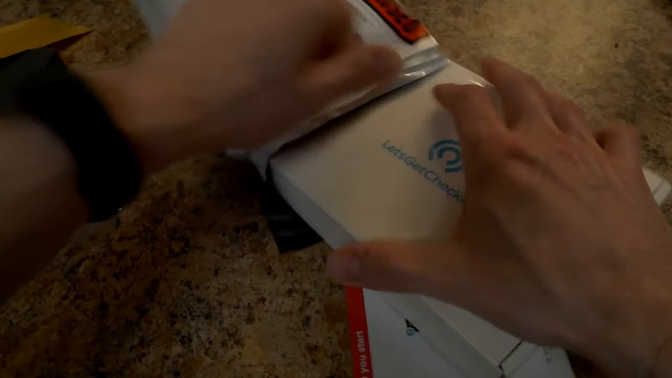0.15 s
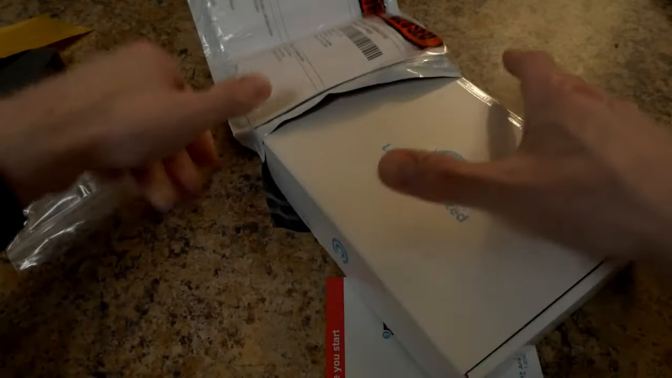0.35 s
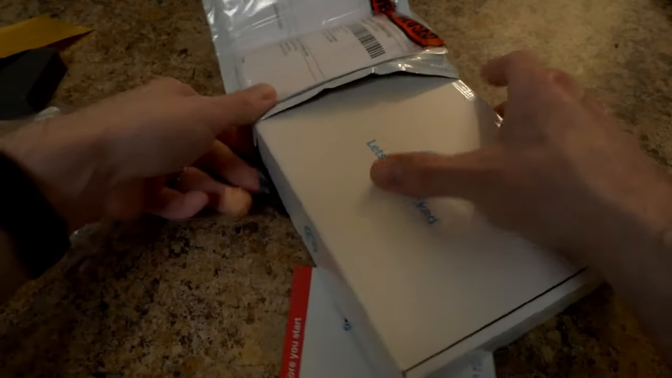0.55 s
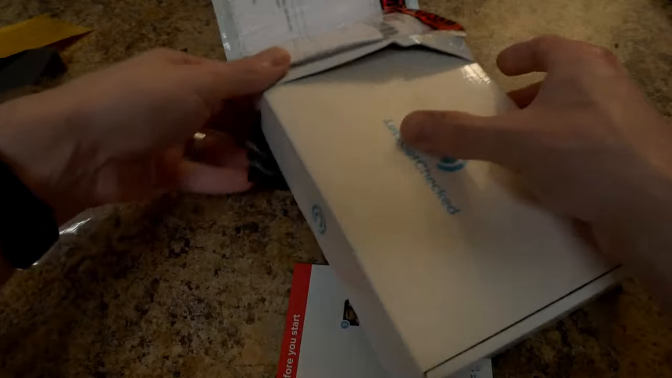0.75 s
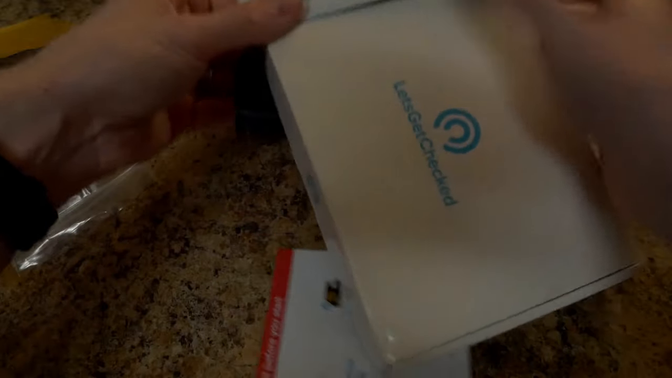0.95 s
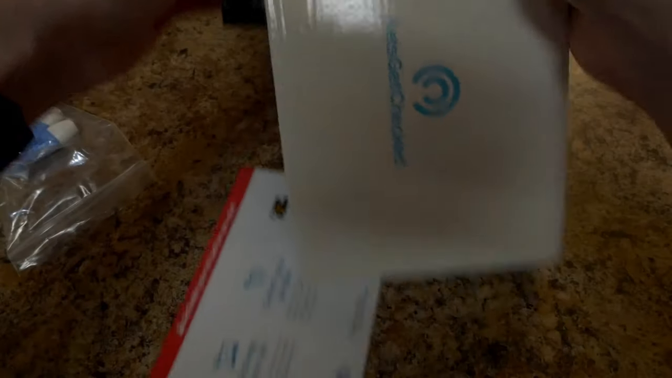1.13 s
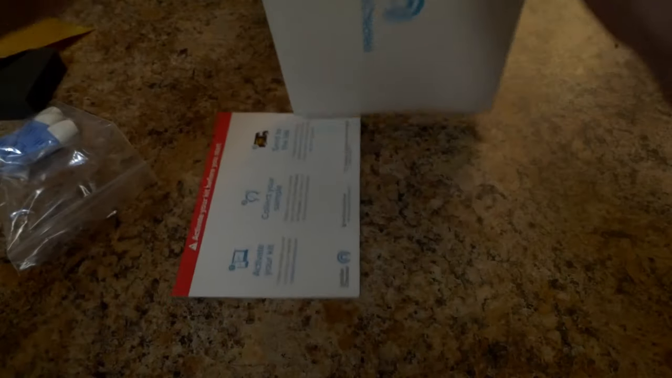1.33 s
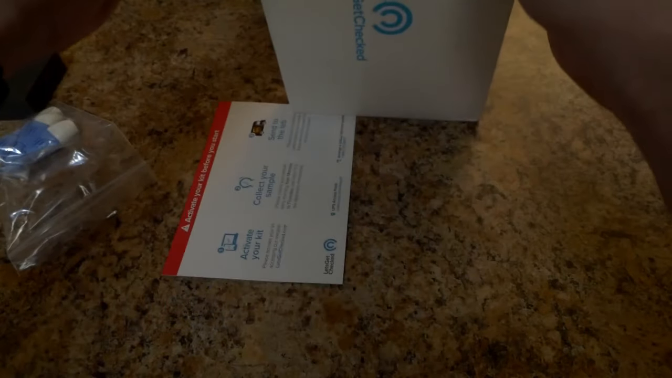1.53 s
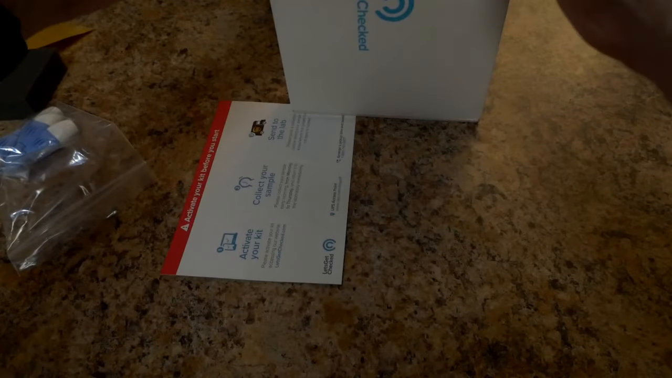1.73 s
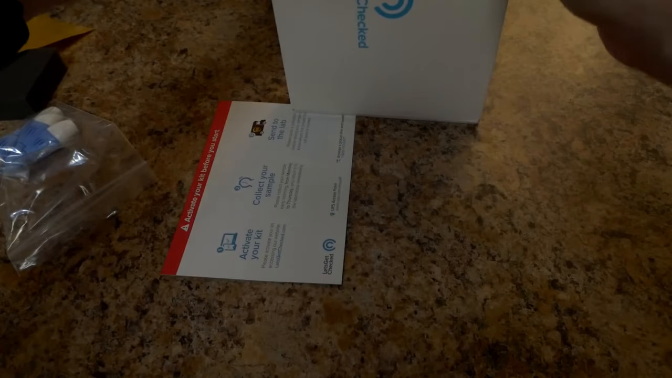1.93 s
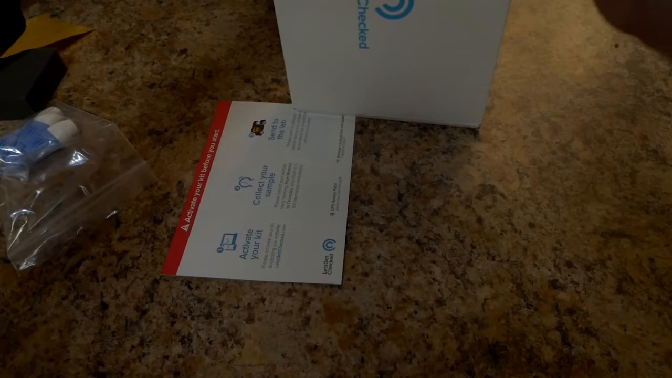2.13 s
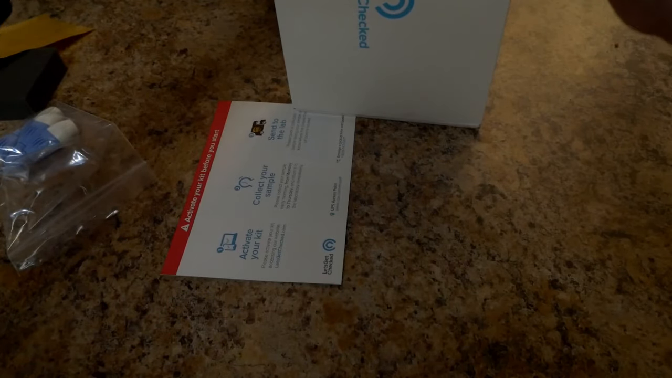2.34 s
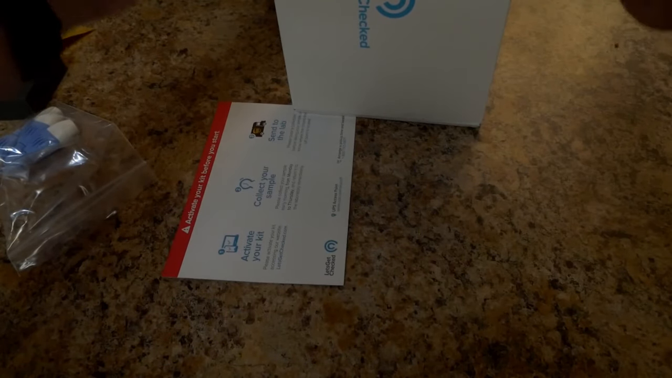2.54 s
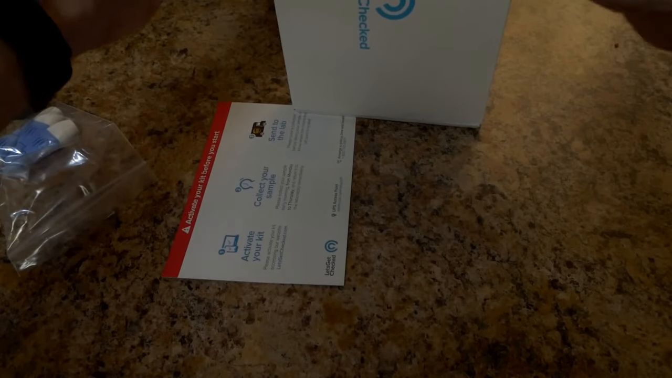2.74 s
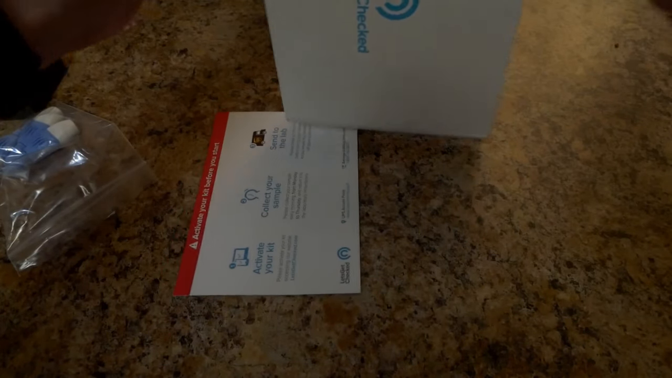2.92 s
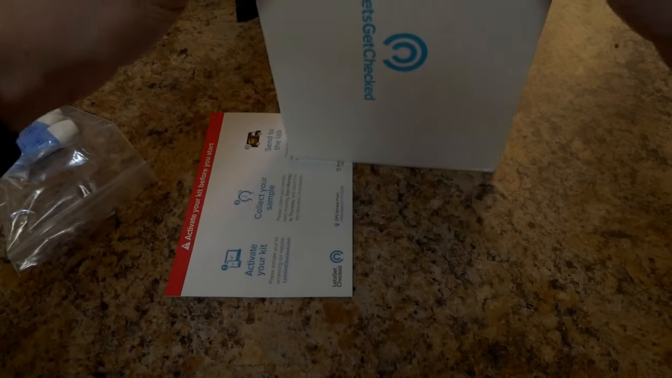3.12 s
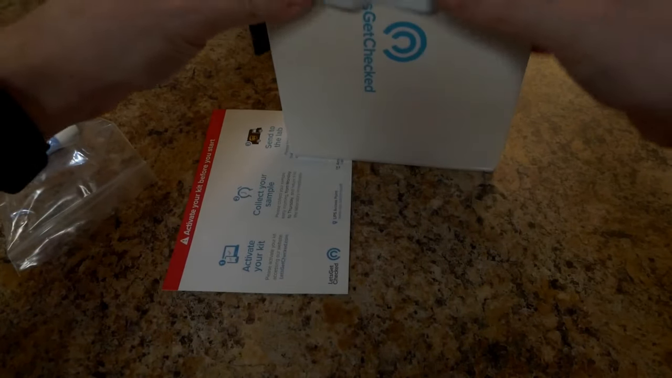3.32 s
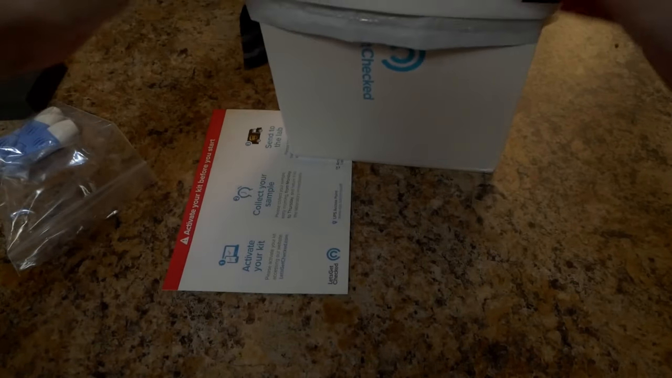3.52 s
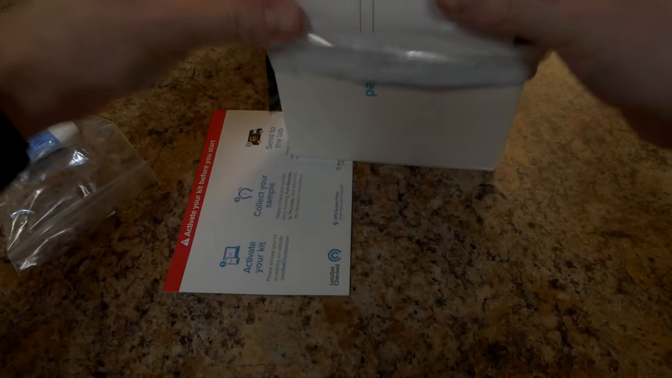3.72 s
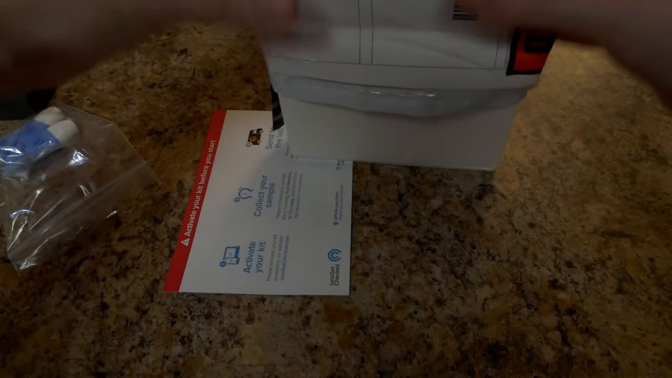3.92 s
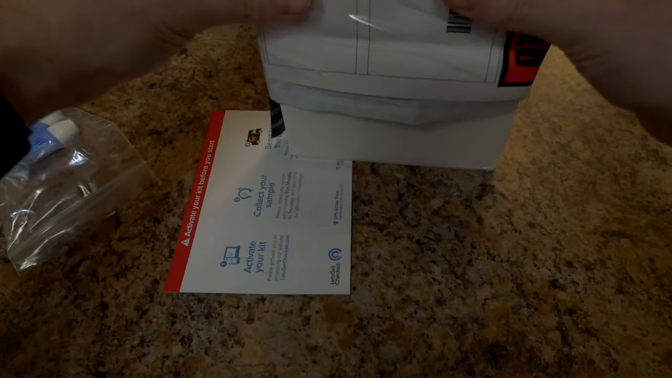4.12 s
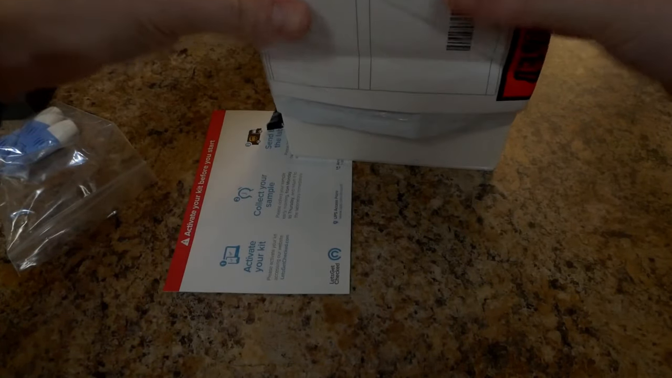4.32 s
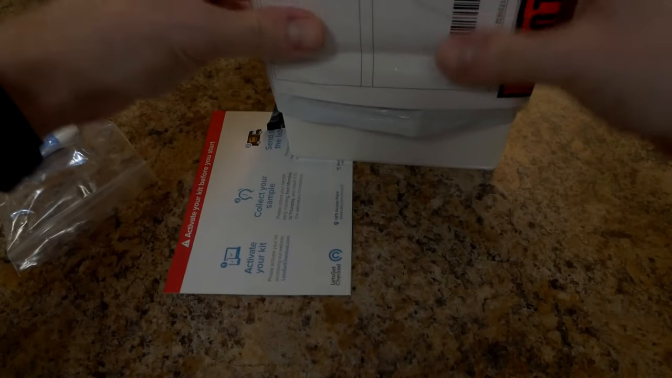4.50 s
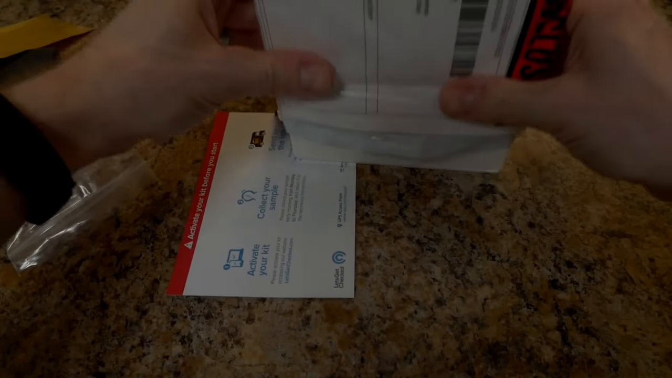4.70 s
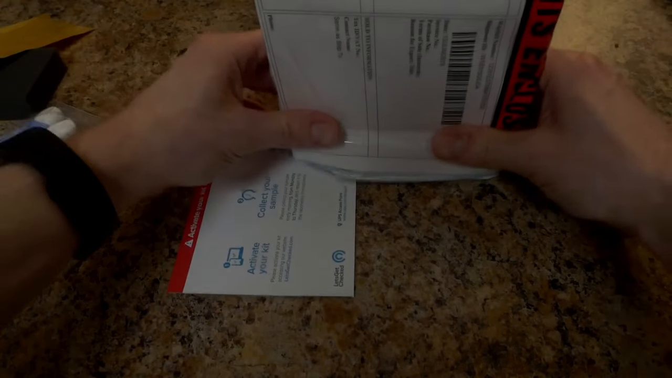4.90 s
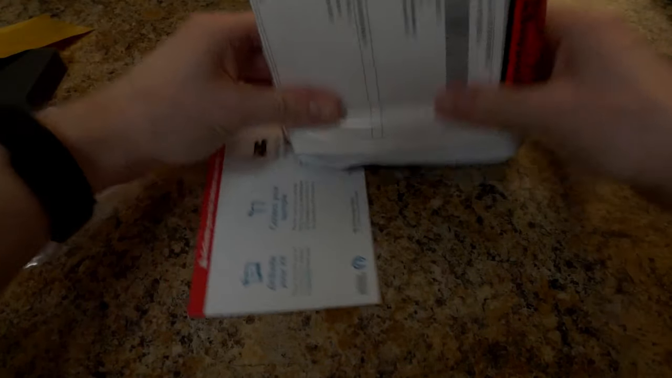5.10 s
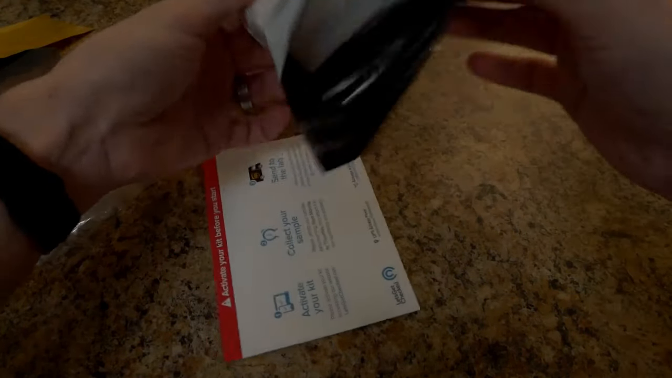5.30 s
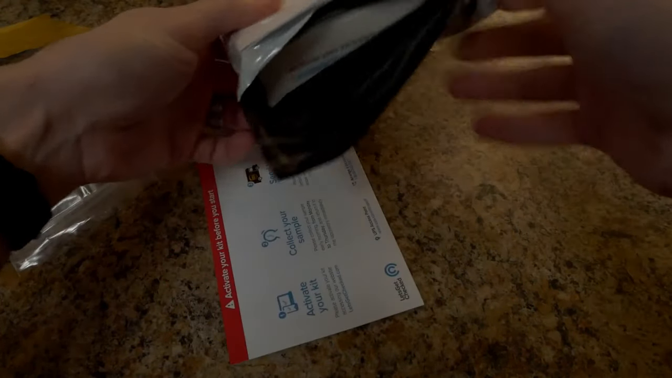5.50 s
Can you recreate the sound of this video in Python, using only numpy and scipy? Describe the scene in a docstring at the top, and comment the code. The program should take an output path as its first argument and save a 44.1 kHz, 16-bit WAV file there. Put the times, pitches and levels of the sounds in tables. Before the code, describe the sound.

Close, crisp plastic rustling with small hollow box knocks, one firm thump on a stone counter, then busier crinkling over low hum.

```python
"""Film crackle opens over a low hum and room air, then knocks on a hollow box and sharp plastic snaps.
Hands work a stiff plastic mailing bag over a cardboard box on a stone kitchen counter, close to the microphone.
Creases are filtered noise bursts that also excite the air pocket and the box; knocks and thuds are decaying
modes of box and counter. The box is twice set down with a falling thump; late on, the bag rubs round it with a
hollow swish. Sparse kitchen reflections surround it all; the sound is nearly mono, with a little added width."""
import sys
import numpy as np
from scipy import signal
from scipy.fft import rfft, irfft, next_fast_len
from scipy.io import wavfile
from scipy.ndimage import uniform_filter1d

SR = 44100
rng = np.random.default_rng(int(sys.argv[2]) if len(sys.argv) > 2 else 0)


def materialize(psi):
    """Save the field psi as 16-bit PCM at rate SR to the path in sys.argv[1].

    A 1-D psi becomes a single channel; in a 2-D psi each row is a channel.
    """
    bounded = np.clip(np.atleast_2d(psi).T, -1, 1)
    quanta = np.round(bounded * 32767).astype(np.int16)
    wavfile.write(sys.argv[1], SR, quanta)


N = 244881


def amp(db):
    """Amplitude factor of a level in dB."""
    return 10 ** (np.asarray(db) / 20)


def evened(x):
    """Scales to an RMS of 1."""
    return x / np.sqrt(np.mean(x ** 2) + 1e-20)


def read(points, hz):
    """Reads a (frequency, value) curve along a logarithmic frequency axis."""
    f, value = np.transpose(points)
    return np.interp(np.log(hz + 1), np.log(f + 1), value)


def coloured(x, points):
    """Filters by a spectrum of (frequency [Hz], level [dB]) points."""
    size = next_fast_len(len(x))
    gain = amp(read(points, np.fft.rfftfreq(size, 1 / SR)))
    return irfft(rfft(x, size) * gain, size)[:len(x)]


def tinted(grain, hz, octaves, skirt_db):
    """Keeps a band around hz and a weak skirt of the rest: the size of a crease sets its colour."""
    f = np.fft.rfftfreq(len(grain), 1 / SR) + 1
    band = amp(-6 * (np.log2(f / hz) / max(octaves, .2)) ** 2) + amp(skirt_db)
    return irfft(rfft(grain) * band, len(grain))


def patchy(x, patchy_db):
    """The colour drifts in patches as different folds take their turn."""
    z = signal.stft(x, nperseg=256)[2]
    patches = rng.standard_normal(z.shape[::-1]).T
    patches = uniform_filter1d(patches, size=9, axis=0)  # smooth over frequency
    patches = evened(uniform_filter1d(patches, size=8, axis=1))  # smooth over time
    return signal.istft(z * amp(patchy_db * patches), nperseg=256)[1][:N]


def add(mix, s, sound):
    """Adds a sound to the mix from time s [s]."""
    part = mix[max(round(s * SR), 0):][:len(sound)]
    part += sound[:len(part)]


def ring(x, hz, width):
    """Two-pole resonance of gain about 1 at hz."""
    r = np.exp(-np.pi * width / SR)
    return signal.lfilter([1 - r, 0, r - 1], [1, -2 * r * np.cos(2 * np.pi * hz / SR), r * r], x)


def burst(noise, ms):
    """A crease gives way: noise that rises at once and decays with a time constant of ms / 2.4."""
    u = np.arange(len(noise)) / SR / (max(ms, .3) / 2400)
    return noise * (1 - np.exp(-3.0 * u)) * np.exp(-u)


# Bursts of rustling close to the microphone: tugs at the bag, and the shudder after the box lands:
# (start [s], end [s], film crackle level at the start [dB], at the end [dB],
# then relative to that crackle: pocket ring [dB], box rumble [dB], top fizz [dB])
RUSTLES = [(0, 0.017, -48, -53, 5, 9.5, -3), (0.142, .25, -48.5, -56, -1.5, 4, -4),
           (0.277, 0.299, -46, -52, 5.5, 7, 5), (0.313, 0.38, -59, -58, 4, 4, -14),
           (0.453, 0.57, -59, -55.5, 3, 6.5, 4.5), (0.647, 0.713, -61.5, -57, 3.5, 2.5, 9),
           (0.791, 1.016, -46, -58.5, -3.5, 2, -3), (1.045, 1.067, -43.5, -49, -10, -8, -6),
           (1.102, 1.19, -42.5, -45.5, -6, -5, 1), (1.252, 1.38, -41.5, -54, -2.5, -5.5, -0.5),
           (1.43, 1.548, -44.5, -58, 2.5, 4, -12), (1.563, 1.621, -54, -54, 2.5, 3, -20),
           (1.69, 1.827, -57.5, -52.5, -2.5, 0, -2), (1.888, 2.11, -50.5, -58, -8, -0.5, -10),
           (2.149, 2.308, -49, -54, -2, 1, -2), (2.353, 2.47, -56, -77, -1, 6.5, 5),
           (2.525, 2.577, -50.5, -33.5, -7.5, -2, -4), (2.577, 2.75, -44, -48, -9, -4, -8),
           (2.81, 2.962, -55, -53, -2, 3, -2), (3.018, 3.023, -54, -56, 7.5, -2, -12),
           (3.076, 3.147, -56, -56.5, -1, -5, 3), (3.215, 3.457, -41, -47, -2, -1.5, 0.5),
           (3.602, 3.716, -57.5, -44, 7.5, 8.5, 5), (3.693, 3.81, -42.5, -44, 2.5, -1, 1),
           (3.812, 3.91, -42, -46.5, -9, -3.5, -9), (4.037, 4.147, -51.5, -44, 2, 1.5, 2),
           (4.185, 4.242, -48, -40, 4.5, -0.5, 8), (4.258, 4.405, -46.5, -54, -9, -7.5, 1),
           (4.535, 4.67, -56.5, -63, 1.5, 2, 4), (4.672, 4.82, -48.5, -47, 1.5, -0.5, 3),
           (4.831, 4.933, -42.5, -41.5, -0.5, -1, 5.5), (4.94, 4.994, -42, -48.5, 2, 1.5, -2),
           (5.093, 5.277, -49.5, -53.5, -2.5, 0.5, 5.5), (5.344, 5.42, -51.5, -39.5, 1, -2.5, 5),
           (5.428, 5.55, -44.5, -42.5, 0, 3.5, 0)]
RISE_DB_PER_S, FALL_DB_PER_S, REST_DB = 498, 242, -64.5  # a rustle bites quickly and lets go slowly


def handling(s):
    """At times s the strongest rustle sets the film level; rows film, pocket, box, fizz [dB], power-weighted."""
    start, end, from_db, to_db, *colour_db = np.transpose(RUSTLES)[:, :, None]
    progress = np.clip((s - start) / np.maximum(end - start, 1e-3), 0, 1)
    held_db = from_db + (to_db - from_db) * progress
    before, after = np.maximum(start - s, 0), np.maximum(s - end, 0)
    rustle_db = held_db - RISE_DB_PER_S * before - FALL_DB_PER_S * after
    share = amp(np.maximum(rustle_db, -200)) ** 2
    film_db = np.maximum(rustle_db.max(0), REST_DB)
    return [film_db] + [(share * c).sum(0) / share.sum(0) for c in colour_db]


def creases(per_s, spread_db):
    """Random instants at which creases flip: many small, a few large, in clumps."""
    clumps = amp(4.5 * evened(uniform_filter1d(rng.standard_normal(N), 900)))
    size = amp(spread_db * np.minimum(rng.exponential(1, N), 5))
    flips = rng.random(N) < per_s * clumps / SR
    return size * flips * rng.choice([-1., 1.], N)


# Air between film and box: (resonance [Hz], width [Hz], level [dB])
POCKET = [(1110, 81, -4), (1276, 240, -3.5), (1654, 200, -2), (2470, 2200, -8)]


def pocket(x, shift=1):
    """Broad resonances of the air trapped under the film."""
    return sum(amp(db) * ring(x, shift * hz, width) for hz, width, db in POCKET)


# Colour of the film crackle: (frequency [Hz], relative level per Hz [dB])
FILM = [(1200, -21), (2000, -5), (2400, -16), (2800, -9.5), (4600, -13), (6300, -8.5), (9000, -3.5),
        (13000, 3), (15000, -3), (16500, 9)]
# Modes of the hollow box, played here and by the knocks: (frequency [Hz], relative level [dB], 60 dB decay [s])
BOX = [(150, 7, 0.042), (245, -3.5, 0.032), (320, 0.5, 0.032), (491, 4.5, 0.023), (627.6, 5, 0.013),
       (800, 0, 0.013), (950, -2, 0.019), (1132, -6, 0.037), (1340, -5, 0.015), (1528, 3, 0.016),
       (1818, 5.5, 0.015), (2220, 4.5, 0.018), (2750, 12, 0.0098)]
SLIDE_SHARE = .65  # RMS of the smooth sliding hiss against the crackle


def rustle():
    """The same crease flips sound in the film, ring the air pocket and shake the box."""
    s = np.arange(0, N / SR + .002, .002)
    t = np.arange(N) / SR
    film_db, pocket_db, box_db, fizz_db = (np.interp(t, s, c) for c in handling(s))
    flips, kind = creases(per_s=1600, spread_db=3.0), rng.integers(0, 24, N)
    crackle = np.zeros(N)
    for k, hz in enumerate(np.geomspace(600, 14000, num=24)):
        grain = burst(tinted(rng.standard_normal(400), hz, octaves=0.27, skirt_db=-12), ms=1.0)
        crackle += signal.oaconvolve(flips * (kind == k), grain / np.linalg.norm(grain))[:N]
    # film also slides over the card: separate hiss for film, pocket and box
    hiss = np.array([patchy(row, patchy_db=5.5) for row in rng.standard_normal((3, N))])
    to_film, to_pocket, to_box = evened(crackle) + SLIDE_SHARE * hiss
    film = evened(coloured(to_film, FILM))
    fizz = signal.sosfiltfilt(signal.butter(2, 8000, "highpass", fs=SR, output="sos"), film)
    film = evened(film - fizz) + amp(fizz_db) * evened(fizz)  # taut film fizzes higher than slack film
    body = np.zeros(N)
    for k, (hz, db, t60) in enumerate(BOX[1:6]):
        body += amp(db) * ring(to_box, hz, 5.86 / t60) * (-1) ** k  # damped more than after a blow
    air = amp(pocket_db) * evened(pocket(to_pocket))
    return amp(film_db) * (film + air + amp(box_db) * evened(body))


# Room air around the microphone: (frequency [Hz], relative level per Hz [dB])
AIR = [(12, -44), (20, 5), (65, 6), (113, 10), (210, 7), (472, 7), (923, 1.5), (1810, -12), (2460, -19),
       (3340, -9), (4540, -25), (13500, -57), (16000, -29)]
AIR_DB = -55  # RMS
# Mains hum under the scene: (time [s], level [dB])
HUM = [(0, -58), (2.5, -58), (3.8, -60), (4.4, -58.5), (4.9, -59.5), (5.1, -67), (5.55, -61)]
HUM_HZ, HUM_HALF_DB = 120, -12.5  # main tone; relative level of the tone an octave below


def room_tone():
    """Steady air noise and a mains hum that wavers slightly in phase and level."""
    t = np.arange(N) / SR
    waver = uniform_filter1d(uniform_filter1d(rng.standard_normal((2, N)), 2500), 2500)
    phase_waver, level_waver = evened(waver)
    turn = 2 * np.pi * HUM_HZ * t + .6 * phase_waver
    hum = np.sqrt(2) * (np.sin(turn) * amp(3 * level_waver) + amp(HUM_HALF_DB) * np.sin(turn / 2))
    air = amp(AIR_DB) * evened(coloured(rng.standard_normal(N), AIR))
    return air + amp(np.interp(t, *np.transpose(HUM))) * hum


# Blows on the box: (time [s], peak level before the bass cut [dB], centre of the modes struck [Hz],
# spread to half amplitude [octaves], at least 0.25 in use)
KNOCKS = [(0.1158, -21.5, 626, 0.87), (0.1633, -29, 1700, 0.49), (0.171, -32, 1800, 0.41),
          (.228, -32, 875, 0.39), (0.2442, -33, 1000, .4), (.268, -38, 1000, 0.43),
          (.2739, -15.5, 810, 0.57), (.2745, -23.5, 1900, 0.36), (0.2814, -26.5, 398, 1.04),
          (.288, -32, 800, .5), (0.3208, -25, 940, 0.37), (.342, -36, 950, 0.44), (.359, -35, 900, .4),
          (0.4159, -31, 358, 1.3), (0.477, -33, 590, 0.7), (.4888, -32, 1720, 0.45),
          (.4974, -28.5, 720, 0.88), (0.5207, -27, 540, 0.28), (.5383, -23, 885, 0.3),
          (0.54, -28.5, 2020, 0.44), (0.6532, -36.5, 660, 0.23), (0.7056, -29.5, 970, 0.63),
          (0.7987, -28, 800, 0.36), (.863, -31, 497, 0.76), (0.997, -39, 696, 0.38),
          (1.042, -39, 1290, 0.91), (1.1248, -31.5, 800, 0.7), (1.177, -29, 1230, 1.6),
          (1.4071, -18, 716, 0.45), (1.4089, -19, 1100, 0.56), (1.4085, -21, 2750, .25),
          (1.418, -26, 1100, 0.45), (1.422, -39, 800, .5), (1.426, -37, 1110, 0.34),
          (1.434, -32, 1800, 0.46), (1.443, -30, 1500, .3), (1.455, -39, 700, .6), (1.468, -33, 900, 0.63),
          (1.474, -42, 1100, .5), (1.514, -38, 1600, 0.25), (1.531, -36, 800, 0.65),
          (1.583, -28, 1200, 1.4), (1.7445, -37.5, 534, 0.21), (1.839, -30.5, 1700, 0.3),
          (1.8982, -32.5, 1320, 0.75), (2.134, -34, 1800, 0.66), (2.147, -36, 600, 1.2),
          (2.251, -34, 1280, 0.75), (2.3585, -37.5, 905, 3.2), (2.454, -32.5, 1880, 0.32),
          (2.5685, -26, 950, 1.2), (2.698, -29, 1400, 3.2), (2.7665, -33, 695, 2), (2.944, -35, 520, 0.22),
          (3.013, -33, 1340, 1.5), (3.0758, -21, 500, 0.68), (3.078, -31, 1900, 0.46),
          (3.088, -27, 1880, 0.37), (3.0926, -31, 600, 0.76), (3.0965, -35, 500, .8), (3.102, -36, 500, .6),
          (3.118, -35, 1070, 0.6), (3.123, -41, 1100, 0.37), (3.2145, -31, 1880, 0.25),
          (3.2508, -33, 1600, 0.45), (3.2694, -24.5, 570, 1.1), (3.2875, -31, 900, .7),
          (3.2945, -24, 470, 1.16), (3.3318, -23, 560, 1.1), (3.338, -31, 517, 0.65),
          (3.3507, -26.5, 1350, 0.22), (3.354, -28, 517, 0.88), (3.3885, -31, 1300, 0.3),
          (3.406, -44, 448, 0.65), (3.454, -30, 1320, 2.5), (3.4973, -50, 1160, 1),
          (3.5322, -37.5, 1110, 1.5), (3.582, -37.5, 603, 0.45), (3.693, -32.5, 1500, 0.44),
          (3.702, -26, 1000, .6), (3.712, -28, 800, .4), (3.721, -32, 1390, .4), (3.733, -26, 1850, .3),
          (3.746, -27, 1600, 0.63), (3.758, -28.5, 1200, 0.35), (3.773, -26, 1800, 0.37),
          (3.783, -31, 1800, .3), (3.791, -28, 1800, 0.26), (3.8107, -21, 1630, 0.55),
          (3.83, -34, 604, 0.61), (3.838, -22.5, 1110, 1), (3.85, -25, 1600, 0.65), (3.8644, -23, 676, 1.6),
          (3.9063, -26.5, 1550, 0.73), (4.0335, -27.5, 530, 1.9), (4.1431, -22.5, 860, 0.74),
          (4.148, -22, 1200, 2), (4.2933, -24.5, 1180, 3.8), (4.5332, -26, 950, 1),
          (4.7234, -23, 1190, 0.57), (4.7316, -31, 875, 0.44), (4.8667, -32, 1490, 0.3),
          (4.869, -30, 600, .4), (4.8942, -18.5, 1460, 0.2), (4.9053, -16, 900, 0.97),
          (4.951, -27, 1400, 0.55), (4.977, -32, 650, 0.63), (5.02, -27, 1610, 0.94),
          (5.1439, -29, 544, 0.67), (5.149, -29, 610, 0.54), (5.157, -28.5, 800, 0.59),
          (5.162, -35, 1300, 0.94), (5.172, -33, 600, 0.32), (5.201, -32.5, 520, 0.98),
          (5.314, -31.5, 540, 1.7), (5.3579, -32, 770, 0.95), (5.3928, -29, 950, 0.29),
          (5.409, -36, 800, 0.87), (5.4274, -22.5, 1100, 1.3), (5.447, -29.5, 550, .4),
          (5.476, -27, 1700, .4), (5.524, -31, 1900, 0.35), (5.52, -30, 550, 0.35),
          (5.462, -29, 1700, 0.49), (5.494, -27.5, 1820, 0.27)]
BOX_SHIFT = 0.038  # each grip bends the box modes (relative spread)


def knocks():
    """Each blow rings the box modes near its centre pitch; low modes speak a little later."""
    out, t = np.zeros(N), np.arange(3000) / SR
    hz, mode_db, t60 = np.transpose(BOX)[:, :, None]
    sides = rng.choice([-1., 1.], (len(KNOCKS), len(BOX), 1))  # the spot struck sets the sign of each mode
    bends = np.exp(BOX_SHIFT * rng.standard_normal(sides.shape))
    for (s, db, centre_hz, octaves), side, bend in zip(KNOCKS, sides, bends):
        struck_db = mode_db - 6 * (np.log2(hz / centre_hz) / max(octaves, .25)) ** 2
        rise = 1 - np.exp(-(t * hz / 0.49) ** 2)
        decay = side * amp(struck_db - 60 * t / t60)
        blow = (decay * rise * np.cos(2 * np.pi * hz * bend * t)).sum(0)
        add(out, s, amp(db) * blow / abs(blow).max())
    # a small box radiates no deep bass
    return signal.sosfilt(signal.butter(2, 90, "highpass", fs=SR, output="sos"), out)


def lesser(per_s, above_db, spread_db, low_hz, high_hz):
    """Random small events whose strength follows the handling: rows (time [s], peak level [dB], pitch [Hz])."""
    place, size, pitch, chance = rng.random((400, 4)).T
    s = place * N / SR
    db = handling(s)[0] + above_db - spread_db * np.log(np.maximum(size, 1 / 8))
    rows = np.transpose([s, db, low_hz * (high_hz / low_hz) ** pitch])
    return list(rows[chance < per_s * N / SR / len(s)])


# Loud creases popping over near the microphone: (time [s], peak level of the bright part [dB], brightest [Hz])
SNAPS = [(0.1194, -42, 6800), (.1672, -36, 3300), (.218, -28.5, 10500), (.229, -24.5, 3620),
         (0.2808, -39, 5900), (.3215, -27.5, 4200), (0.3728, -31.5, 5800), (.4165, -38, 8900),
         (.4548, -36, 3280), (.498, -27, 8150), (.499, -29.5, 3300), (.5405, -43, 2900),
         (.545, -22.5, 9100), (.5465, -30.5, 3320), (0.706, -24, 11200), (.7743, -30, 11000),
         (0.7975, -24, 9700), (0.8598, -20.5, 6300), (.9293, -36, 4100), (.9544, -52, 6300),
         (0.9973, -34, 9000), (1.0415, -17.5, 6750), (1.093, -32, 3500), (1.1213, -25, 9400),
         (1.185, -23, 3700), (1.3516, -60, 6300), (1.383, -23, 7350), (1.4074, -12.5, 6240),
         (1.4082, -17, 3300), (1.425, -35, 3800), (1.4677, -27, 5400), (1.5956, -23, 5800),
         (1.607, -32, 4000), (1.648, -35.5, 3300), (1.689, -33.5, 6960), (1.7541, -31.5, 10600),
         (1.8392, -37, 6800), (1.9027, -28.5, 5400), (1.934, -31, 9500), (1.9463, -22, 8300),
         (1.956, -30, 7160), (2.01, -34.5, 5650), (2.058, -33.5, 10100), (2.106, -41, 3200),
         (2.1347, -25.5, 3240), (2.1486, -26.5, 3920), (2.2188, -31, 7440), (2.2537, -27.5, 6400),
         (2.271, -34, 3000), (2.283, -43, 3600), (2.2976, -22, 8600), (2.5252, -32, 9700),
         (2.57, -30, 5230), (2.658, -24, 3850), (2.698, -26, 3900), (2.721, -28, 9900),
         (2.7336, -26.5, 9200), (2.8314, -39, 7700), (2.9086, -28, 6100), (2.957, -30, 7100),
         (3.011, -40, 3700), (3.0762, -28, 3900), (3.0877, -34, 3100), (3.1174, -23, 5800),
         (3.1786, -35, 5700), (3.186, -32.5, 3280), (3.2095, -17, 6460), (3.2155, -31, 3500),
         (3.2535, -19, 7250), (3.277, -23, 3830), (3.3119, -21, 6100), (3.3544, -19.5, 12600),
         (3.4004, -23.5, 7300), (3.4345, -49, 3200), (3.4554, -25, 5000), (3.502, -41, 3000),
         (3.51, -37, 3300), (3.5456, -33, 12400), (3.582, -39, 4200), (3.597, -43, 2780),
         (3.618, -37, 7500), (3.7063, -22.5, 7700), (3.7645, -22, 10800), (3.831, -28, 4160),
         (3.8497, -26, 7350), (3.865, -21, 6100), (3.8984, -19.5, 8200), (4.0542, -26, 4000),
         (4.061, -25, 7000), (4.077, -33, 6500), (4.083, -31, 3300), (4.099, -23.5, 6550),
         (4.1045, -26, 6200), (4.1171, -24, 7340), (4.121, -33, 2800), (4.1286, -21, 6800),
         (4.13, -31, 4300), (4.149, -24, 5700), (4.2413, -20, 9200), (4.266, -24, 10100),
         (4.2947, -23, 3800), (4.322, -25, 8500), (4.3478, -23, 3170), (4.3822, -27, 11100),
         (4.392, -34, 3600), (4.4123, -30, 10100), (4.439, -36.5, 2980), (4.5107, -37.5, 2730),
         (4.5365, -48, 6400), (4.6153, -32.5, 3030), (4.6897, -25, 7700), (4.7217, -26, 4170),
         (4.9056, -17.5, 6300), (4.906, -23, 3300), (4.977, -20.5, 10200), (5.022, -36, 3100),
         (5.099, -31, 10400), (5.1005, -33, 3320), (5.155, -30, 4000), (5.1837, -16.5, 9200),
         (5.2112, -23.5, 8500), (5.2122, -31, 4230), (5.232, -37, 3400), (5.2415, -32, 9100),
         (5.271, -35, 3960), (5.318, -23, 7650), (5.394, -19.5, 7660), (5.4147, -22, 5300),
         (5.428, -18, 6800)]
SNAP_OCTAVES, SNAP_MS, SNAP_VARIETY = 0.71, 1.68, 0.63  # typical width and length; no two creases alike
SNAP_POCKET_DB, POCKET_DB_PER_OCTAVE = -7, -7  # pocket ring of a 6 kHz pop; brighter creases ring it less
POCKET_SHIFT = 0.2  # each fold traps its own pocket (relative spread of its resonances)


def snaps():
    """Each pop is a short burst of its own colour, with a ring of the pocket."""
    pops = list(SNAPS) + lesser(per_s=60, above_db=0, spread_db=1.8, low_hz=2600, high_hz=12000)
    out = np.zeros(N)
    high = signal.butter(2, 2600, "highpass", fs=SR, output="sos")
    for s, db, hz in pops:
        noise = rng.standard_normal(700)
        width_draw, length_draw, pocket_draw = rng.standard_normal(3)
        octaves = SNAP_OCTAVES * np.exp(SNAP_VARIETY * width_draw)
        ms = SNAP_MS * np.exp(SNAP_VARIETY * np.clip(length_draw, -1, 1))
        bright = signal.sosfilt(high, burst(tinted(noise, hz, octaves, skirt_db=-28), ms))
        low = pocket(burst(noise, ms), np.exp(POCKET_SHIFT * pocket_draw))
        pocket_db = SNAP_POCKET_DB + POCKET_DB_PER_OCTAVE * np.log2(hz / 6000)
        add(out, s, amp(db) * (bright / abs(bright).max() + amp(pocket_db) * low / abs(low).max()))
    return out


# The weight of the box landing or leaning on the counter:
# (time [s], peak level before the bass cut [dB], tilt over the counter modes [dB per octave])
THUDS = [(0.269, -37, -1), (0.859, -49, 12), (1.409, -22, 2), (2.149, -40, 0), (3.08, -32, -6),
         (3.089, -52, 3), (3.621, -42.5, 10), (3.864, -63, 3), (4.032, -47, -20)]
# Modes of the stone counter: (frequency [Hz], relative level [dB], 60 dB decay [s])
COUNTER = [(70.5, -7, 0.16), (121, 0.5, 0.099), (151.3, 20.5, 0.04), (177, -3, 0.082), (236, -8, 0.022)]


def thuds():
    """A soft push sets the low modes of the counter going."""
    out, t = np.zeros(N), np.arange(9000) / SR
    hz, mode_db, t60 = np.transpose(COUNTER)[:, :, None]
    rise = 1 - np.exp(-(t * hz) ** 2)
    for s, db, tilt_db in THUDS:
        struck = amp(mode_db + tilt_db * np.log2(hz / 150) - 60 * t / t60)
        thud = (struck * rise * np.cos(2 * np.pi * hz * t)).sum(0)
        add(out, s, amp(db) * thud / abs(thud).max())
    # the slab moves little air below its first mode
    return signal.sosfilt(signal.butter(2, 55, "highpass", fs=SR, output="sos"), out)


# The box lands on the counter: the first row is its edge slapping down, the others the air squeezed out from
# under it as it lands flat: (time [s], level [dB], first pitch [Hz], last pitch [Hz], fall time [ms], length
# [ms])
LANDINGS = [(1.4072, -10, 1780, 1250, 2.9, 3.9), (1.4076, -6.5, 740, 196, 4.16, 6.3),
            (3.0768, -22, 710, 130, 2.26, 8.4), (3.0894, -26, 920, 170, 2.46, 5)]


def landings():
    """Short gliding swings at each landing: a brief slap of the box edge, and trapped air gliding down as the
    gap closes."""
    out, t = np.zeros(N), np.arange(1200) / SR
    for s, db, first_hz, last_hz, fall_ms, length_ms in LANDINGS:
        hz = last_hz + (first_hz - last_hz) * np.exp(-(1000 * t / fall_ms) ** 2)
        u = 1000 * t / length_ms
        envelope = (1 - np.exp(-(u / 0.074) ** 2)) * np.exp(-u * u * u)
        add(out, s, amp(db) * envelope * np.sin(2 * np.pi * np.cumsum(hz) / SR))
    return out


# The bag rubs round the lifted box, a hollow swish: (time [s], resonance [Hz], level [dB])
SWISH = [(5.05, 852, -73), (5.066, 800, -53), (5.09, 619, -45), (5.122, 558.5, -54), (5.144, 531, -48),
         (5.17, 622, -45), (5.192, 855, -47), (5.203, 538, -52), (5.23, 515, -66), (5.248, 498, -46),
         (5.3, 510, -62), (5.31, 529, -48)]
SWISH_POLE_HZ = 250  # bandwidth of each of the two cascaded poles


def swish():
    """Rubbing noise in a resonance that wanders as the gap between film and box changes."""
    out, (s, hz, db) = np.zeros(N), np.transpose(SWISH)
    t = np.arange(s[0], s[-1], 1 / SR)
    r = np.exp(-np.pi * SWISH_POLE_HZ / SR)
    noise = rng.standard_normal((2, len(t)))
    for _ in range(2):
        noise = signal.lfilter([1], [1, -r], noise)
    turn = 2 * np.pi * np.cumsum(np.interp(t, s, hz)) / SR
    rub = evened(noise[0] * np.cos(turn) + noise[1] * np.sin(turn))  # shifts the slow noise up to the resonance
    add(out, s[0], amp(np.interp(t, s, db)) * signal.windows.tukey(len(t), .15) * rub)
    return out


# Decay of the kitchen: (frequency [Hz], 60 dB decay [s])
KITCHEN = [(100, 0.3), (500, 0.18), (2000, 0.15), (8000, 0.12)]


def kitchen(x):
    """Sparse reflections, each band dying at its own speed; three random sets fade so no steady tone remains."""
    at = np.arange(100, SR // 2 - 20, 20)
    out, turn = np.zeros(N), np.arange(N) / SR * 2 * np.pi * 3
    for k in range(3):  # each set is faded in and out by its own 3 Hz cosine
        taps = np.zeros(SR // 2)
        taps[at + rng.integers(0, 20, len(at))] = rng.choice([-1., 1.], len(at))
        hz, t, z = signal.stft(taps, SR, nperseg=256)
        tail = signal.istft(z * amp(-60 * t / read(KITCHEN, hz)[:, None]), SR, nperseg=256)[1]
        sent = x * np.sqrt(2 / 3) * np.cos(turn + k * np.pi / 3)
        out += signal.oaconvolve(sent, tail / np.linalg.norm(tail))[:N]
    return out


# Faint added stereo width: (frequency [Hz], side relative to mid [dB])
WIDTH = [(25, -32), (60, -21), (180, -26), (550, -25), (1000, -23.5), (1650, -25.5), (2800, -21.5),
         (4970, -19), (15000, -16)]


def scene():
    """Nearly mono: a faint phase-scattered copy is added to widen the sound slightly."""
    near = rustle() + snaps() + knocks() + thuds() + landings() + swish()
    mid = near + amp(-10.0) * kitchen(near) + room_tone()
    z = signal.stft(mid, nperseg=512)[2]
    scattered = signal.istft(z * np.exp(2j * np.pi * rng.random(z.shape)), nperseg=512)[1][:N]
    side = coloured(scattered, WIDTH)
    return np.array([mid + side, mid - side])


EDGE_HZ = 15900  # upper band limit


def record(dry):
    """Loud peaks are softly rounded off; then a low-pass sets the band limit."""
    soft = .95 * np.tanh(dry / .95)
    lowpass = signal.firwin(511, EDGE_HZ, window=("kaiser", 9), fs=SR)
    return signal.oaconvolve(soft, lowpass[None], "same")


dry = scene()
out = record(dry)
materialize(out)
```